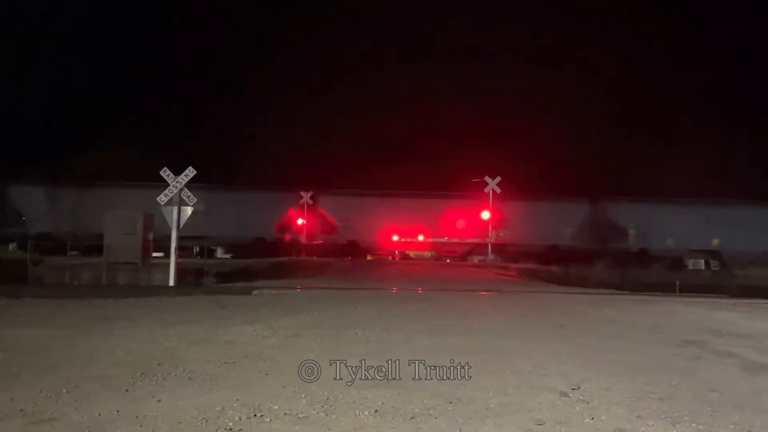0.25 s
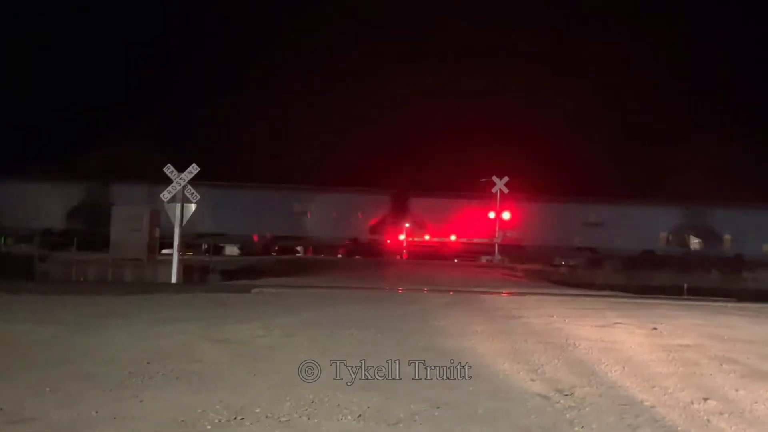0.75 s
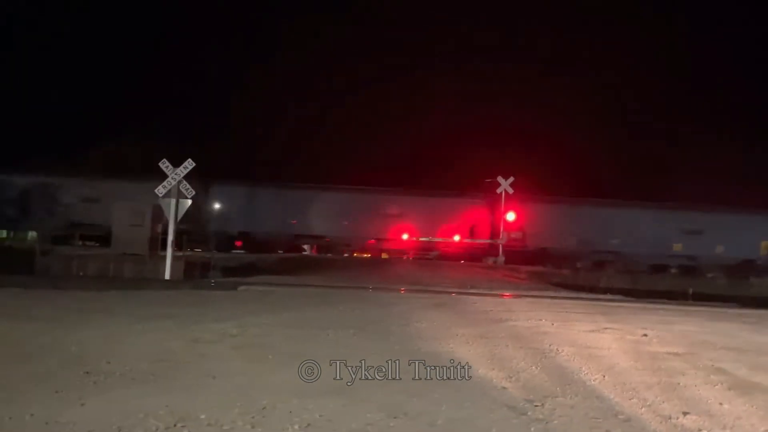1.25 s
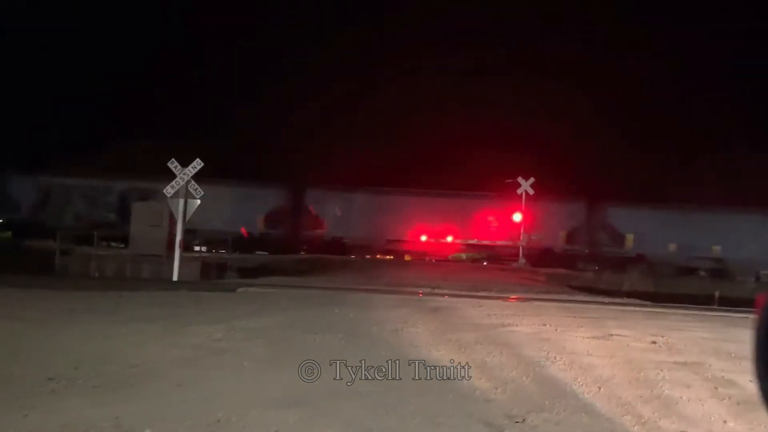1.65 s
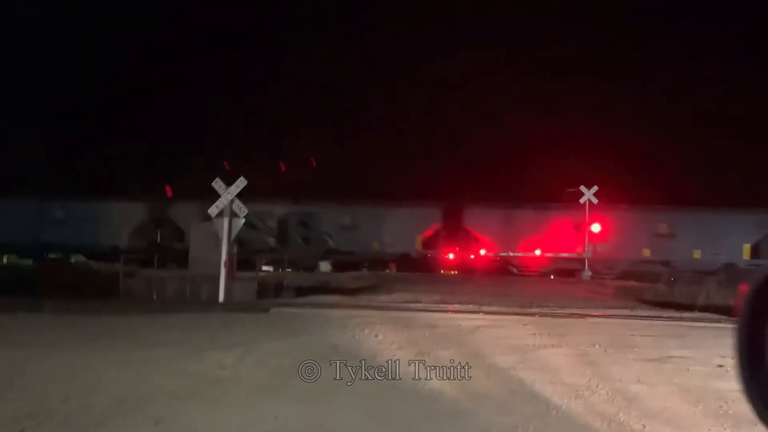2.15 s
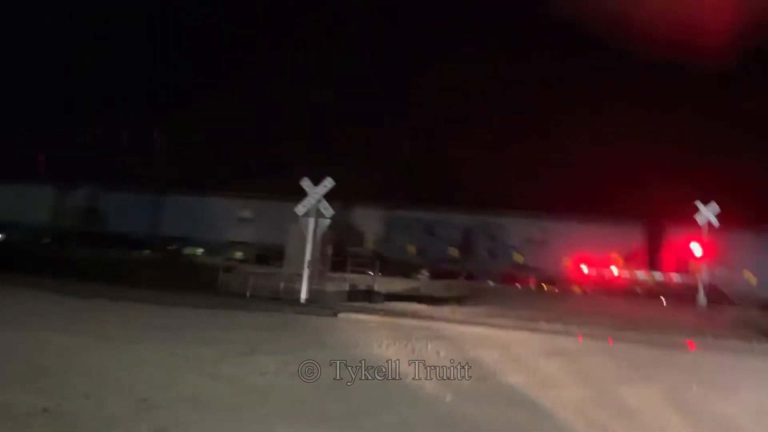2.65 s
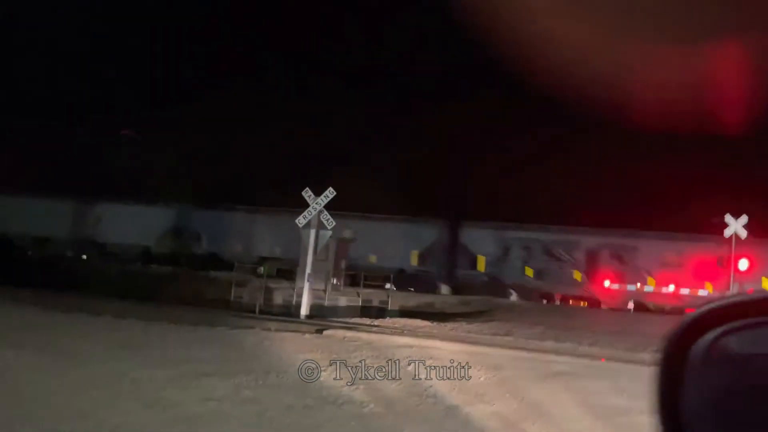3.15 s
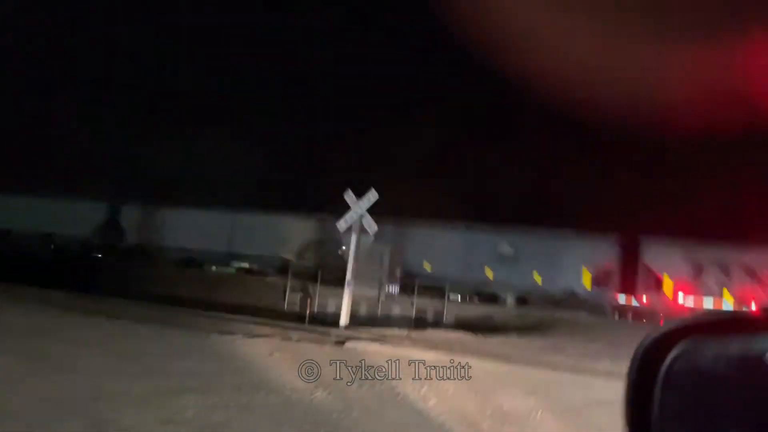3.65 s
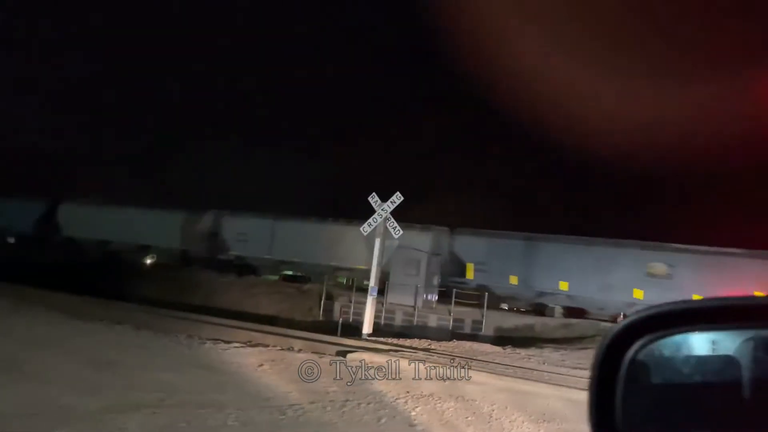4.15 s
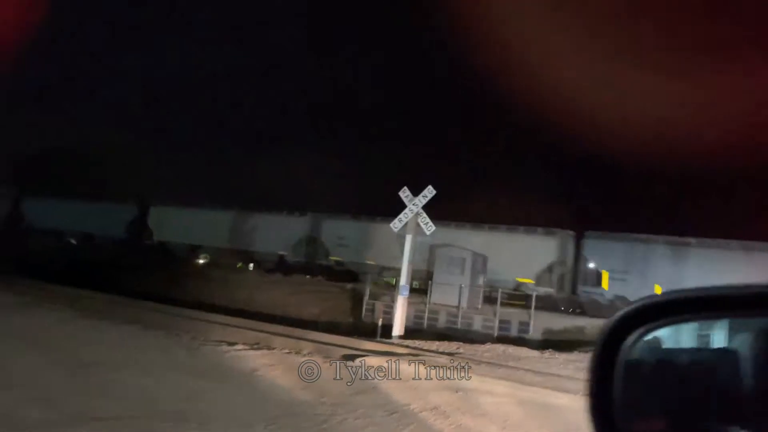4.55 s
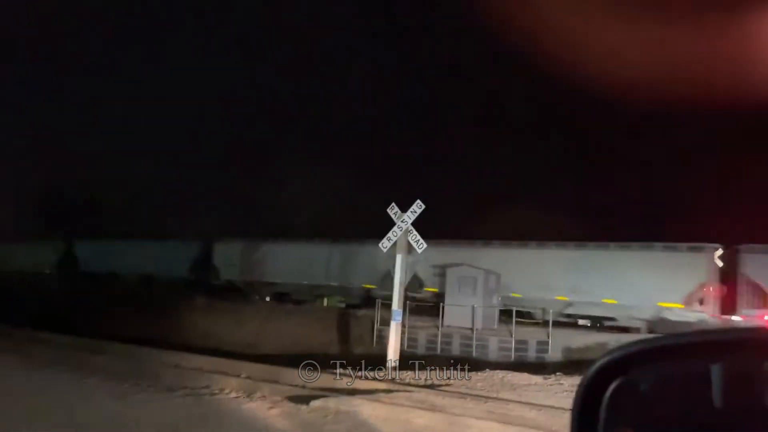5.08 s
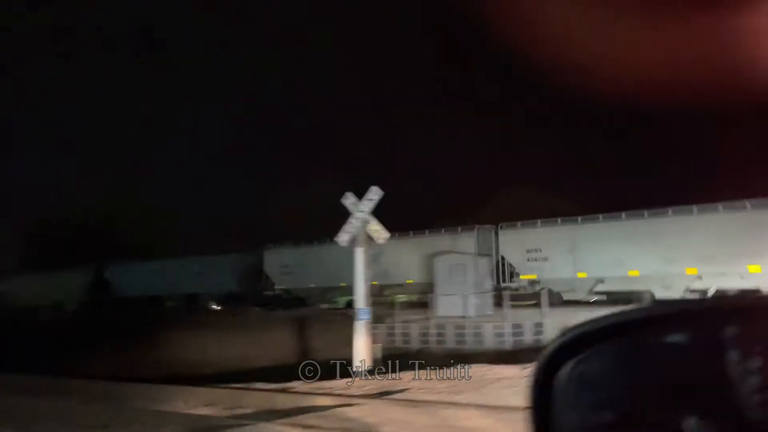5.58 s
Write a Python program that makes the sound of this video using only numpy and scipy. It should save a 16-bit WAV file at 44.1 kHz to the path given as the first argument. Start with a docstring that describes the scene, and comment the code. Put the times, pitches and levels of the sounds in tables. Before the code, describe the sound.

A long freight train runs past throughout, outdoors at night, heard in stereo from a car's open window. From 0 to 3 s, low wagon boom swells unevenly under coarse wheel rumble, midrange roar and wavering bright hiss, with a light breeze on the microphone. Loose steel clanks cluster at about 0.45-0.7 s, then at 1.1-1.8 s, with a tiny high squeal near 1.7 s and a brief scrape at 2.6 s. At 3 s a strong gust arrives, thudding in dull, irregular lumps until about 4.5 s; the rail sings brightly from 3.2 s and thin flange squeals come at 3.1, 3.9 and 4.3 s. A hard clank cracks at 4.3 s. After 4.55 s wind and deep boom fall away and the rolling becomes a hollow, surging drone, dipping near 4.95 s then rising. A sharp crack at 4.95 s, faint squealing, small ticks around 5.3 s and late clanks follow; the train is still passing at the end.

```python
"""A long freight train rolls over a level crossing at night, heard from a car's open window.
Wagon bodies boom in narrow low noise; wheels rumble, roar and hiss in coloured noise with slow resonances.
Wheel modes and the rail ring, loose steel clanks in short mode clusters, flanges rub and squeal briefly.
A draught buffets the microphone in lumps of dull noise, hardest in the middle, and then drops away."""
import sys
import numpy as np
from scipy import signal
from scipy.fft import rfft, irfft, next_fast_len
from scipy.io import wavfile
from scipy.ndimage import uniform_filter1d, map_coordinates

SR = 44100
rng = np.random.default_rng(int(sys.argv[2]) if len(sys.argv) > 2 else 0)


def generate_wav(sig):
    """Save sig (samples, or channels by samples) to the path in sys.argv[1] as 16-bit PCM at SR."""
    pcm = np.round(np.clip(np.atleast_2d(sig).T, -1, 1) * 32767).astype(np.int16)
    wavfile.write(sys.argv[1], SR, pcm)


N = 256662
TIME = np.arange(N) / SR   # s
SIZE = next_fast_len(N)
FREQS = np.maximum(np.arange(SIZE // 2 + 1) * SR / SIZE, 1)   # Hz

# Swells of the boom as a heavy wagon rocks, ahead of ROCK_GAIN_DB: [t/s, level/dB]
WAGON_ROCKS = [(0.389, -13.5), (0.879, -14), (1.209, -11), (1.439, -11.5), (1.699, -11), (2.049, -15),
               (3.789, -11), (4.079, -10.5)]
# How hard the wheels run on the rail, as the level of their rumble: [t/s, level/dB]
RUMBLE_LEVEL = [(0, -25), (1.5, -25.5), (1.9, -25.5), (2.9, -24.5), (4.58, -22.5), (4.68, -27.5),
                (4.95, -29.5), (5.17, -22.5), (5.82, -23)]
# Rise and fall of the bright wheel-tread hiss; only the swing about its mean counts: [t/s, level/dB]
HISS_SWING = [(0.03, -43.5), (0.33, -48), (0.61, -43), (0.87, -47.5), (1.64, -43), (1.83, -48),
              (2.36, -45.5), (4.45, -45.5), (4.8, -47.5), (5.8, -44.5)]
# Ringing modes of the wheels, level ahead of a common trim: [f/Hz, width/Hz, level/dB]
WHEEL_MODES = [(1545, 160, -47.5), (1561, 16, -52), (1985, 90, -53), (2685, 110, -49.5), (3142, 70, -53),
               (3321, 90, -54), (3960, 170, -54)]
# Singing of the rail: [t/s, level/dB]
RAIL_SONG_LEVEL = [(2.8, -57), (3.2, -38), (4.4, -44), (4.9, -42.5), (5.4, -49)]
# Flange squeals, one row per singing wheel mode: [middle t/s, half length t/s, level/dB, f/Hz]
FLANGE_SQUEALS = [(1.672, .042, -47, 5238), (1.672, .04, -48, 6778), (1.672, .04, -48, 8414),
                  (3.12, .16, -50, 3340), (3.83, .15, -44, 1565), (3.92, .15, -46.5, 2672),
                  (4.275, .055, -41, 2668), (4.8, .4, -52, 2665), (5.42, .1, -50, 3117)]
# Loudest clanks of couplers and bogies, level ahead of their colour:
# [t/s, level/dB, pitch f/Hz, ring time t/s, width as a factor above and below the pitch]
LOUD_CLANKS = [(.437, -16, 1350, .07, 1.35), (.463, -17, 1450, .06, 1.35), (.524, -12, 1330, .12, 1.45),
               (.547, -15, 1560, .07, 1.35), (.711, -20.5, 700, .25, 1.25), (1.135, -18, 620, .09, 1.2),
               (1.243, -16, 700, .14, 1.25), (1.438, -12, 696, .07, 1.12), (1.507, -17, 610, .05, 1.15),
               (1.623, -17, 1200, .07, 1.9), (1.802, -16, 1550, .04, 1.3), (2.058, -24, 1200, .09, 1.5),
               (2.24, -17, 1600, .046, 1.4), (2.594, -17, 1360, .036, 1.5), (4.322, -11.5, 1400, .04, 2.1),
               (4.948, -12, 1850, .022, 1.9), (5.12, -18, 1100, .05, 1.5), (5.603, -17, 900, .1, 1.55),
               (5.763, -14, 1400, .05, 1.35)]
# Small sharp ticks close by: [t/s, level/dB]
NEAR_TICKS = [(0.945, -32.5), (5.3088, -29), (5.335, -23.5)]
# Largest eddies of the draught, level ahead of a common trim:
# [middle t/s, half length t/s, level/dB, upper reach f/Hz]
LARGE_EDDIES = [(2.713, .014, -16, 480), (3.07, .012, -19, 480), (3.099, .012, -9.5, 370),
                (3.18, .02, -18.5, 700), (3.321, .015, -11.5, 560), (3.435, .007, -11, 600),
                (3.866, .014, -16.5, 480), (4.209, .011, -12, 330), (4.321, .013, -13.5, 420),
                (4.394, .005, -11.5, 780), (4.463, .005, -12, 680), (4.541, .014, -14.5, 600),
                (4.618, .013, -16, 560), (4.735, .012, -21, 450), (5.379, .003, -13.5, 520),
                (5.467, .012, -18.5, 380)]
# Spectra of the sources: [f/Hz, level/dB per Hz]
BOOM_SPECTRUM = [(22, -19), (33, -18), (44, -9), (53, 3.5), (65, -2), (120, -29)]
RUMBLE_SPECTRUM = [(50, -17), (90, -7), (330, -0.5), (450, -3.5), (640, -4.5), (800, -10.5), (1050, -12.5),
                   (2500, -79)]
DRONE_SPECTRUM = [(150, 0), (300, -2), (420, 0), (620, 0.5), (800, -6), (1100, -13), (2500, -28)]
ROAR_SPECTRUM = [(600, -7.5), (1000, -1), (1550, 4.5), (1850, -1.5), (2150, -2), (2700, -6), (3300, -8.5),
                 (3650, -13.5), (4400, -15.5), (8000, -27.5)]
HISS_SPECTRUM = [(2500, -12), (4500, 4), (7000, 0), (8700, 6), (10000, -5.5), (11300, 6), (12000, -7),
                 (12600, -31)]
RAIL_SPECTRUM = [(2300, -2.5), (3200, -4.5), (3700, -7.5), (5200, -13.5)]
RUB_SPECTRUM = [(3900, -37), (4600, -1.5), (5150, -6.5), (7000, -31)]
CLANK_SPECTRUM = [(400, 1.5), (1000, 6.5), (3500, -8.5), (10000, -32)]
TICK_SPECTRUM = [(2500, -20), (6500, -21), (8200, 11), (9700, -4), (11200, 6), (13000, -15)]
DRAUGHT_SPECTRUM = [(25, -38), (55, -34), (85, 4), (180, -4), (300, -10), (450, -18.5), (1300, -58)]
# The two microphone ports: [f/Hz, left-right likeness, left lead/rad, left-right level/dB]
MIC_PORTS = [(45, 0.91, -0.5, -2.5), (112, 0.68, 0.32, 3), (564, 0.75, 0.74, 2.5), (930, 0.18, 1.7, 1.5),
             (1680, 0.68, 1.5, 6.5), (2770, 1, 1.23, 4), (4100, 1, 0.87, 1.5), (5130, 0.43, 1.4, 7),
             (9900, 1, -2, -0.5)]

ROCK_HALF_S, ROCK_GAIN_DB = 0.08, -6   # of every swell
BOOM_DB, BOOM_SWAY_DB, BOOM_SINKS_DB = -22.5, 4, 8.5   # between swells; sinks as the draught drops
ROAR_DB, HISS_DB = -34.5, -46   # mean levels
ROAR_FOLLOWS = 0.35   # share of the rumble's swing in dB
# later wagons run with a hollow, surging drone that takes this share of the rumble's power
DRONE_START_S, DRONE_RISE_S, DRONE_SHARE = 4.55, 0.25, 0.84
RUB_DB = -51.5   # light rubbing of the flanges
RUB_EASES_S, RUB_EASE_S, RUB_EASES_DB = 3.3, 0.2, 17   # start, length and depth of its easing
SCRAPE_S, SCRAPE_HALF_S, SCRAPE_DB = 2.6, 0.032, 3   # one flange leans harder on the rail head
LIGHT_CLANK_DB, LIGHT_CLANK_RANGE_DB = -29, 6   # weakest level ahead of the colour, span above it
LIGHT_CLANK_HZ = 800   # lowest pitch
LIGHT_CLANK_T60_S, LIGHT_CLANK_WIDTH = 0.095, 1.45   # ring time, width of the modes as a factor
# the draught is a breeze, then one held gust, then near calm
BREEZE_DB, GUST_DB, CALM_DB = -19.5, -15, -27.5
GUST_START_S, GUST_RISE_S, GUST_END_S, GUST_FALL_S = 3, 0.051, 4.54, 0.063
BUFFET_LOW_HZ = 104   # lower edge of every burst
CUTOFF_HZ = 13100   # top of the microphone's sound


def wagons():
    """Wagon bodies boom near one low pitch, swelling as one rocks; the boom sinks when the gust ends."""
    sinking_db = BOOM_SINKS_DB * ramp(GUST_END_S, GUST_FALL_S)
    steady = from_db(BOOM_DB + BOOM_SWAY_DB * drift(rate=2.8) - sinking_db)
    rocking = sum(from_db(db + ROCK_GAIN_DB) * swell(s, ROCK_HALF_S) for s, db in WAGON_ROCKS)
    boom = evened(at_ports(white(), colour(BOOM_SPECTRUM), near=0.3), span_s=0.097)
    return np.hypot(steady, rocking) * boom


def wheels():
    """Rough steel on steel shakes sleepers and wagons (rumble, drone), rail (roar) and wheel modes."""
    rumble_db = follow(RUMBLE_LEVEL)
    hiss_db = follow(HISS_SWING)
    roar_level = from_db(ROAR_DB + ROAR_FOLLOWS * (rumble_db - rumble_db.mean()))
    hiss_level = from_db(HISS_DB + hiss_db - hiss_db.mean())

    rumble = at_ports(rattle(per_s=80, spread_db=0.5, share=0.43), colour(RUMBLE_SPECTRUM))
    rumble = evened(passing(rumble, depth_db=3, spacing_hz=39.35), span_s=0.33)
    rumble = rumble * from_db(1.7 * drift(rate=8.9))
    drone = evened(at_ports(white(), colour(DRONE_SPECTRUM)), span_s=0.038)
    drone = drone * from_db(0.88 * drift(rate=10.4))
    share = DRONE_SHARE * ramp(DRONE_START_S, DRONE_RISE_S)
    rumble = np.sqrt(1 - share) * rumble + np.sqrt(share) * drone

    roar = at_ports(rattle(per_s=250, spread_db=2, share=0.52), colour(ROAR_SPECTRUM))
    roar = passing(roar, depth_db=3, spacing_hz=45)
    hiss = at_ports(rattle(per_s=830, spread_db=9, share=0.5), colour(HISS_SPECTRUM))
    hiss = passing(hiss, depth_db=4.5, spacing_hz=58.7)

    judder = drift(rate=10.5)   # uneven contact pressure moves all three together
    return (rumble * from_db(rumble_db + 0.31 * judder)
            + roar * roar_level * from_db(0.1 * judder)
            + hiss * hiss_level * from_db(1.4 * judder + 0.69 * drift(rate=45))
            + wheel_ring() * roar_level / np.mean(roar_level))


def wheel_ring():
    """Each lightly damped mode swells and fades; its pitch wanders as one wheel follows another."""
    out = 0
    for hz, width_hz, db in WHEEL_MODES:
        lowpass = signal.butter(2, width_hz / 2, fs=SR, output="sos")
        shaking = signal.sosfilt(lowpass, np.array([white(), white()]))
        phase = 2 * np.pi * np.cumsum(hz + 0.25 * width_hz * drift(rate=1.5)) / SR
        ring = shaking[0] * np.cos(phase) + shaking[1] * np.sin(phase)
        out = out + rms_one(ring) * from_db(db - 5 + 2.2 * drift(rate=3.5))
    return spread(out, 0.86)


def rail():
    """The rail sings in a broad, bright band of shifting resonances, most of all under later wagons."""
    song = passing(at_ports(white(), colour(RAIL_SPECTRUM)), depth_db=6, spacing_hz=50.7)
    return song * from_db(follow(RAIL_SONG_LEVEL))


def clanks():
    """Loose steel cracks and rings in a dense cluster of modes; lighter parts rattle at random."""
    out, length = np.zeros((2, N + SR)), SR // 8
    light = [(when * N / SR, LIGHT_CLANK_DB + LIGHT_CLANK_RANGE_DB * force,
              LIGHT_CLANK_HZ * 3 ** size, LIGHT_CLANK_T60_S, LIGHT_CLANK_WIDTH)
             for when, force, size in rng.random(size=(24, 3))]
    for s, db, hz, t60, width in LOUD_CLANKS + light:
        envelope = blow(0, rise_s=t60 / 45, t60=t60, size=length)
        cluster = signal.butter(3, [hz / width, hz * width], "band", fs=SR, output="sos")
        contact = rng.standard_normal((2, 2 * length))
        # the first half only settles the filter
        ring = evened(signal.sosfilt(cluster, contact), span_s=0.0073)[:, length:]
        ring = ring + from_db(-10) * contact[:, length:]
        hardness = min(1, 0.03 / t60)   # the shorter the ring, the harder the crack
        at = int(s * SR)
        out[:, at:at + length] += from_db(db - 9) * envelope * ring
        out[0, at:at + length] += from_db(db) * hardness * crack(hz, 1.4 * width, length)
    return spread(out[:, :N], colour(CLANK_SPECTRUM), near=0.02)


def flanges():
    """Flanges scrape the rail; now and then one catches and a wheel mode sings."""
    easing_db = RUB_EASES_DB * ramp(RUB_EASES_S, RUB_EASE_S)
    level_db = RUB_DB - easing_db + SCRAPE_DB * swell(SCRAPE_S, SCRAPE_HALF_S)
    scrape = from_db(level_db + 2.4 * drift(rate=27)) * at_ports(white(), colour(RUB_SPECTRUM))
    song = 0
    for s, half_s, db, hz in FLANGE_SQUEALS:
        unsteady_hz = hz * (1 + 0.003 * drift(rate=48.4))   # stick and slip
        phase = 2 * np.pi * np.cumsum(unsteady_hz) / SR
        song = song + from_db(db) * np.exp(-((TIME - s) / half_s) ** 4) * np.sin(phase)
    return scrape + song * from_db([[3], [0]])   # the squeal leans left


def ticks():
    """Tiny bright ticks near the microphone: noise with a quick rise and a short decay."""
    taps = sum(from_db(db) * blow(s, rise_s=0.0003, t60=0.016) for s, db in NEAR_TICKS)
    return taps * evened(at_ports(white(), colour(TICK_SPECTRUM), near=0.39), span_s=0.0016)


def buffets():
    """Single large eddies hit the microphone: brief, dull bursts of turbulence that end abruptly."""
    out, length = np.zeros((2, N + SR)), SR // 5
    for s, half_s, db, reach_hz in LARGE_EDDIES:
        band = signal.butter(3, [BUFFET_LOW_HZ, reach_hz], "band", fs=SR, output="sos")
        burst = evened(signal.sosfilt(band, rng.standard_normal((2, length))), span_s=0.0085)
        at = int(s * SR) - length // 2
        envelope = np.exp(-((TIME[at:at + length] - s) / half_s) ** 4)
        out[:, at:at + length] += from_db(db) * burst * envelope
    return spread(out[:, :N], from_db(-3), near=0.3)


def draught():
    """Eddies break on the microphone in lumps; a stronger gust also brings in more of a higher flutter."""
    gust_db = (GUST_DB - BREEZE_DB) * ramp(GUST_START_S, GUST_RISE_S)
    calm_db = (CALM_DB - GUST_DB) * ramp(GUST_END_S, GUST_FALL_S)
    level = from_db(BREEZE_DB + gust_db + calm_db)
    turbulence = rattle(per_s=90, spread_db=3.5, share=0.72)
    eddies = evened(at_ports(turbulence, colour(DRAUGHT_SPECTRUM), near=0.48), span_s=0.17)
    centre_hz, width_hz = 260, 170
    band = np.minimum(1, FREQS / centre_hz) / (1 + ((FREQS - centre_hz) / width_hz) ** 2)
    lumps = from_db(5.2 * drift(rate=12))
    flutter = lumps * at_ports(rattle(per_s=81, spread_db=4.5, share=1), band, near=0.96)
    flutter = evened(flutter, span_s=0.38)
    return level * (from_db(-0.5) * eddies + from_db(-11.5) * level / level.max() * flutter)


def rattle(per_s, spread_db, share):
    """Rough force: smooth noise plus random knocks of uneven size."""
    born = rng.random(N) < per_s / SR
    sizes = from_db(spread_db * np.minimum(rng.exponential(1, N), 3))
    knocks = born * sizes * rng.choice([-1, 1], (2, N))
    return white() + share * knocks / np.std(knocks)


def passing(x, depth_db, spacing_hz):
    """Each wagon has small resonances of its own, which come and go as it rolls by."""
    stay_s = 0.25
    hz, s, frames = signal.stft(x, SR, nperseg=4096)
    field = rng.standard_normal((2048, 128))   # random gains over pitch and time
    place = np.meshgrid(hz / spacing_hz, s / stay_s, indexing="ij")
    gain = from_db(depth_db * map_coordinates(field, place, order=1, mode="wrap"))
    return rms_one(signal.istft(frames * gain, SR, nperseg=4096)[1][:, :N])


def blow(start, rise_s, t60, size=N):
    """Envelope of one contact: a quick rise and an exponential decay by 60 dB in t60 seconds."""
    age = np.maximum(TIME[:size] - start, 0)
    return (1 - np.exp(-age / rise_s)) * np.exp(-np.log(1000) * age / t60)


def crack(hz, width, size):
    """First instant of a hard contact: one click between hz / width and hz * width, of height 1."""
    band = signal.butter(2, [hz / width, hz * width], "band", fs=SR, output="sos")
    click = signal.sosfilt(band, signal.unit_impulse(size) + 1e-18)
    return click / np.abs(click).max()


def at_ports(force, gain, near=0):
    """A lasting noise spread over the two ports, rms 1."""
    return rms_one(spread(force, gain, near))


def spread(force, gain, near=0):
    """Colour a pair of signals and spread it over the two ports; near sources (1) reach both alike."""
    alike, lead, tilt_db = over_hz(MIC_PORTS)
    far = 1 - near
    alike = np.clip(1 - far * (1 - alike), 0, 1)
    mid, side = rfft(force, SIZE) * gain
    sign = np.array([[1], [-1]])   # left, right
    pair = np.sqrt(1 + alike) * mid + sign * np.sqrt(1 - alike) * side
    tilt = from_db(sign * far * tilt_db / 2)
    turn = np.exp(0.5j * sign * far * lead)
    return irfft(pair * tilt * turn, SIZE)[:, :N]


def colour(points):
    """Gain per frequency, falling away steeply beyond both ends."""
    ends = np.minimum(1, np.minimum(FREQS / points[0][0], points[-1][0] / FREQS))
    return from_db(over_hz(points)[0]) * ends ** 3


def over_hz(rows):
    """Each column of a table joined on a log-frequency axis."""
    hz, *columns = np.transpose(rows)
    return [np.interp(np.log(FREQS), np.log(hz), column) for column in columns]


def follow(curve):
    """A table of times and levels joined by straight lines."""
    return np.interp(TIME, *np.transpose(curve))


def swell(centre_s, half_s):
    """A smooth rise and fall of height 1."""
    return np.exp(-((TIME - centre_s) / half_s) ** 2)


def ramp(start_s, length_s):
    """A straight change from 0 to 1."""
    return np.clip((TIME - start_s) / length_s, 0, 1)


def drift(rate):
    """Slow chance of rms 1 that changes about `rate` times a second."""
    r = np.exp(-80 * np.pi * rate / SR)   # one step is 40 samples
    slow = signal.lfilter([1], [1, -2 * r, r * r], rng.standard_normal(N // 40 + 2002))[2000:]
    return np.interp(np.arange(N) / 40, np.arange(len(slow)), rms_one(slow))


def evened(x, span_s):
    """Hold a noise at an even strength over spans longer than span_s."""
    power = uniform_filter1d(np.mean(x ** 2, axis=0), max(int(span_s * SR), 1))
    return rms_one(x / np.sqrt(power + 1e-9))


def white():
    """Two unrelated white noises."""
    return rng.standard_normal((2, N))


def rms_one(x):
    """Scale so that the middle of the stereo picture has rms 1."""
    return x / np.sqrt(np.mean(np.atleast_2d(x).mean(0) ** 2) + 1e-20)


def from_db(db):
    """Decibels to gain."""
    return 10 ** (np.asarray(db) / 20)


def scene():
    """The train and the air at the window."""
    return wagons() + wheels() + rail() + clanks() + flanges() + ticks() + buffets() + draught()


def record(dry):
    """The highest peaks are rounded and the top is cut."""
    rounded = dry / (1 + np.abs(dry / 0.95) ** 6) ** (1 / 6)
    return signal.sosfilt(signal.ellip(10, 0.1, 80, CUTOFF_HZ, fs=SR, output="sos"), rounded)


dry = scene()
out = record(dry)
generate_wav(out)
```